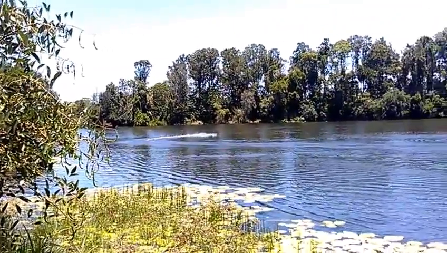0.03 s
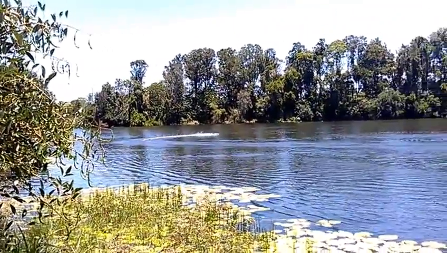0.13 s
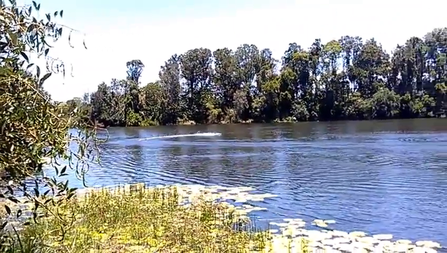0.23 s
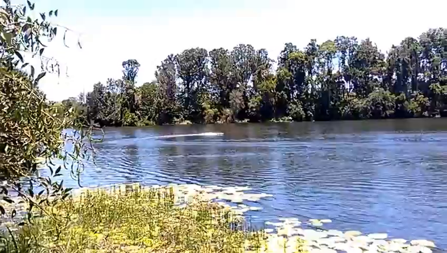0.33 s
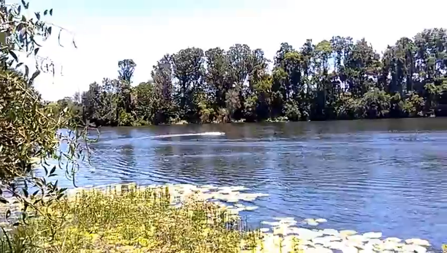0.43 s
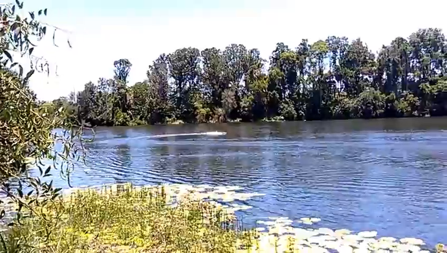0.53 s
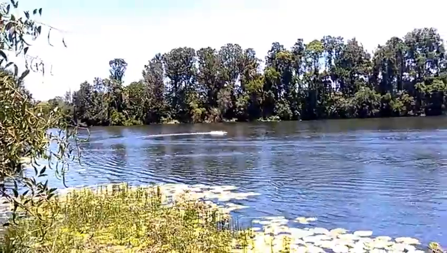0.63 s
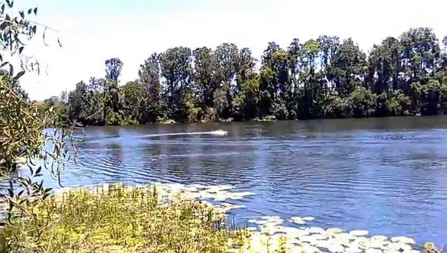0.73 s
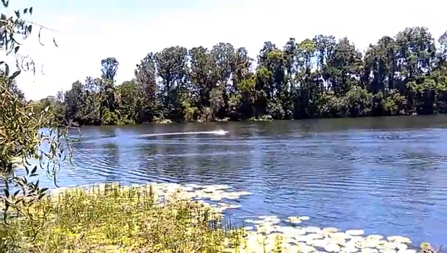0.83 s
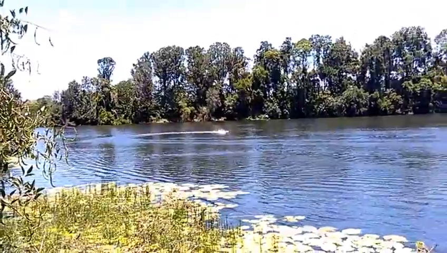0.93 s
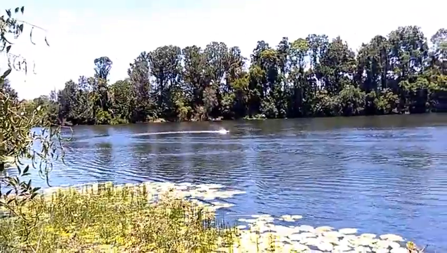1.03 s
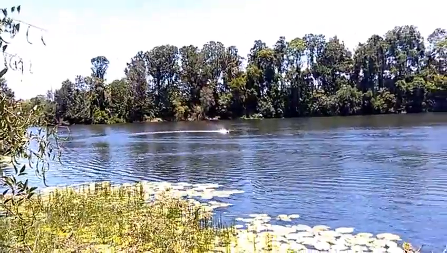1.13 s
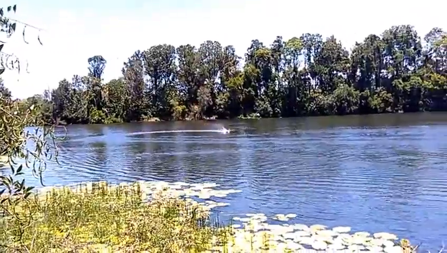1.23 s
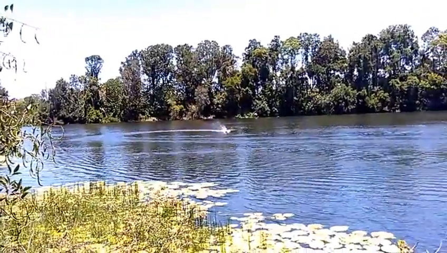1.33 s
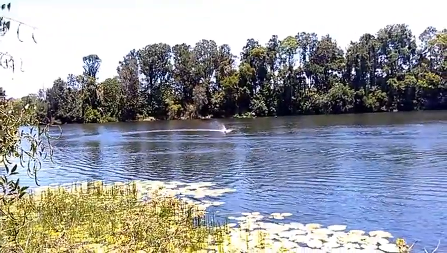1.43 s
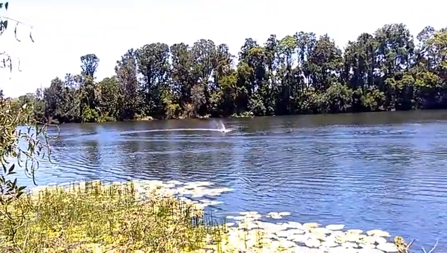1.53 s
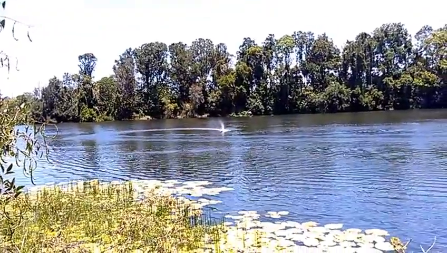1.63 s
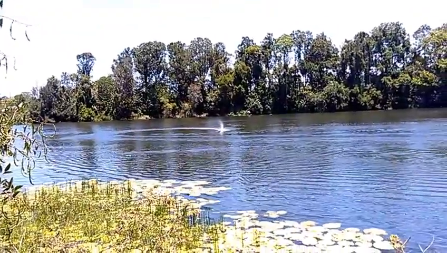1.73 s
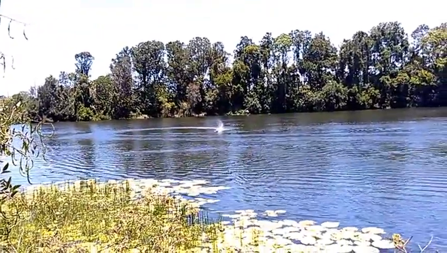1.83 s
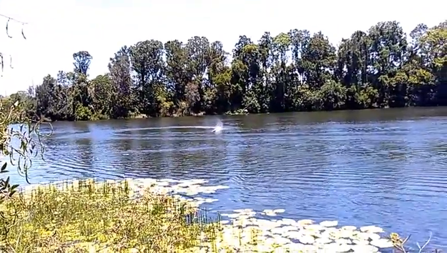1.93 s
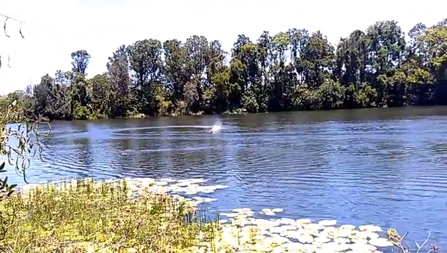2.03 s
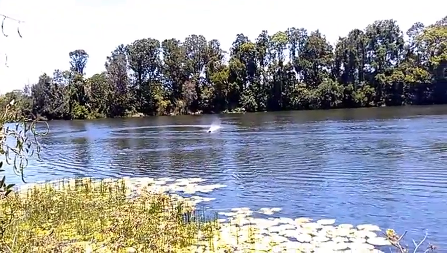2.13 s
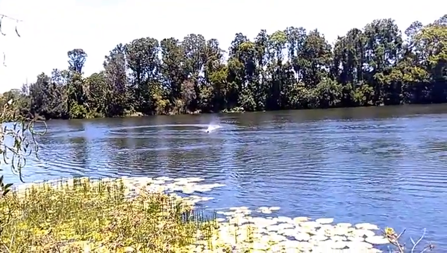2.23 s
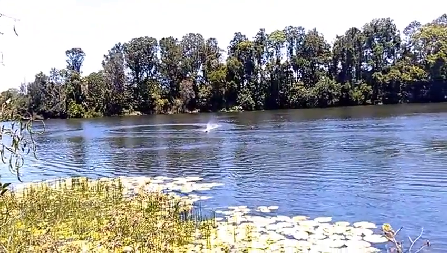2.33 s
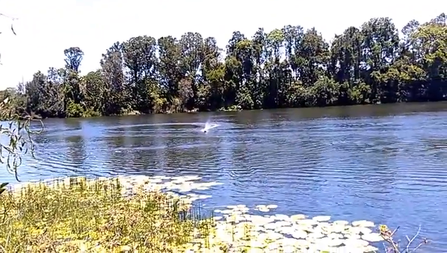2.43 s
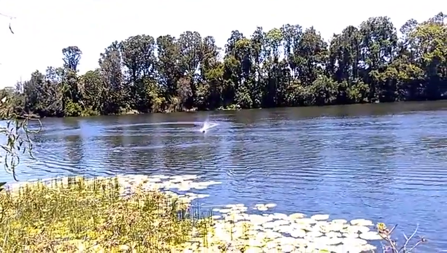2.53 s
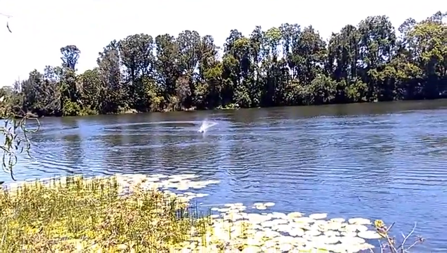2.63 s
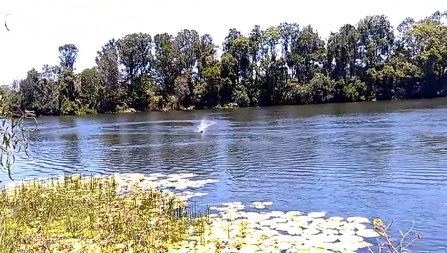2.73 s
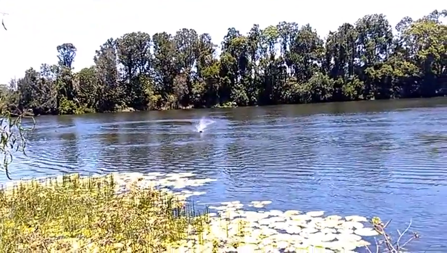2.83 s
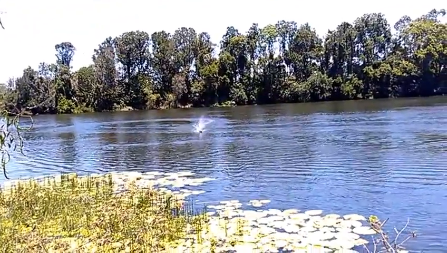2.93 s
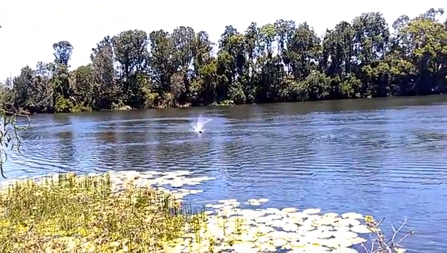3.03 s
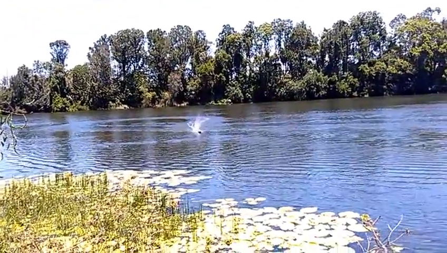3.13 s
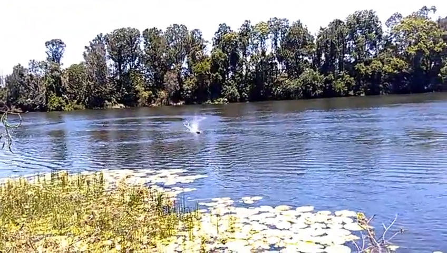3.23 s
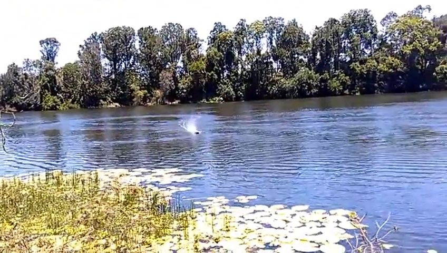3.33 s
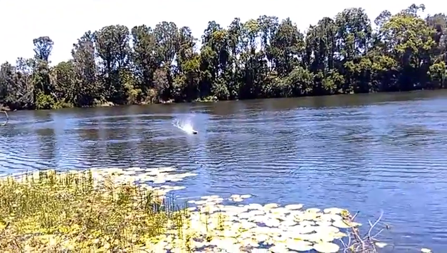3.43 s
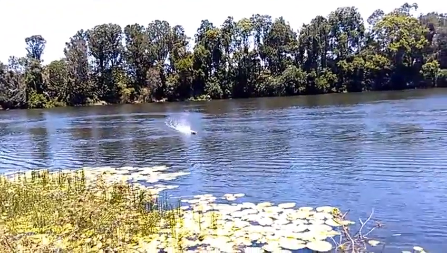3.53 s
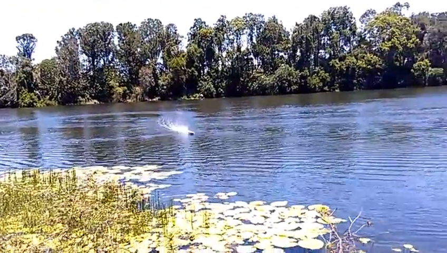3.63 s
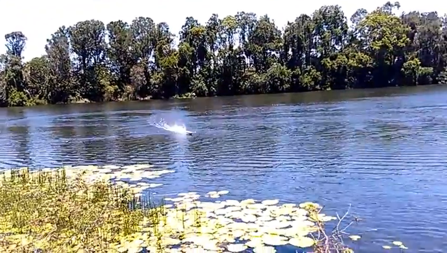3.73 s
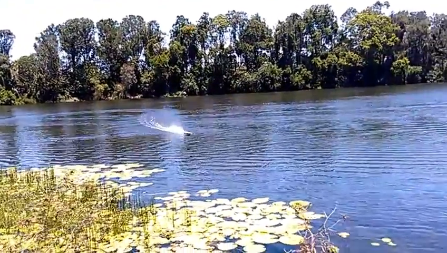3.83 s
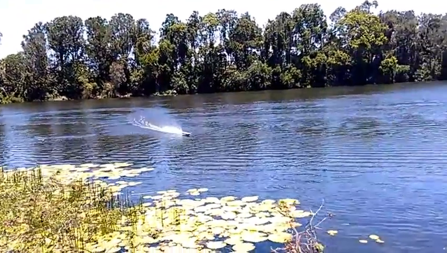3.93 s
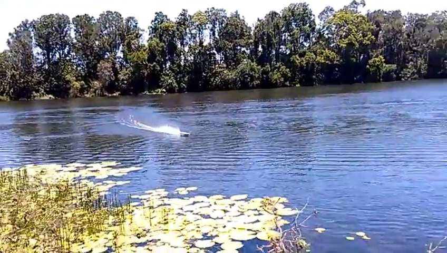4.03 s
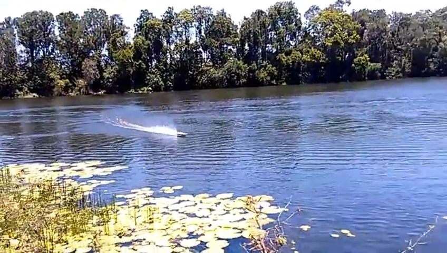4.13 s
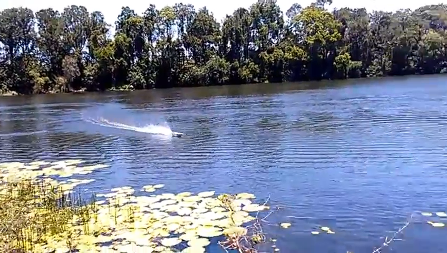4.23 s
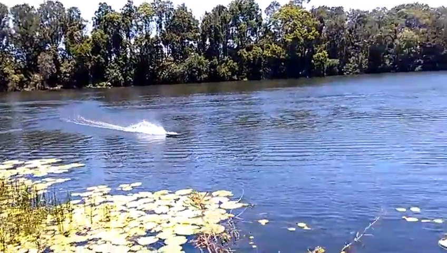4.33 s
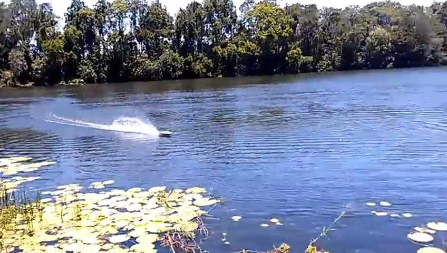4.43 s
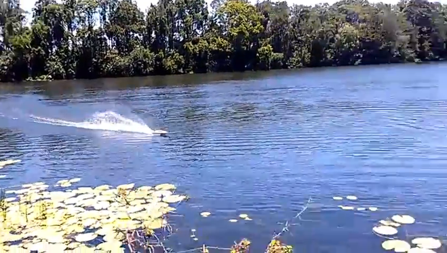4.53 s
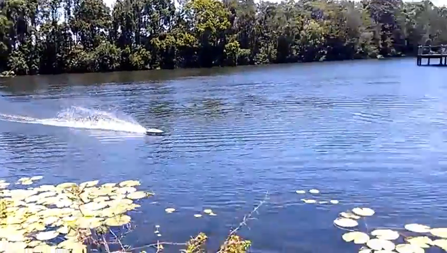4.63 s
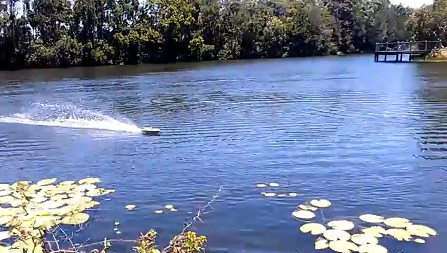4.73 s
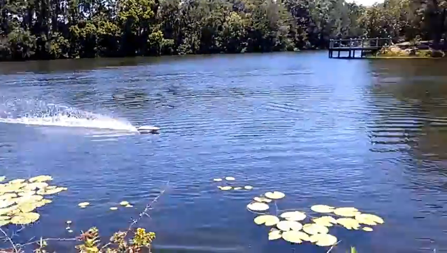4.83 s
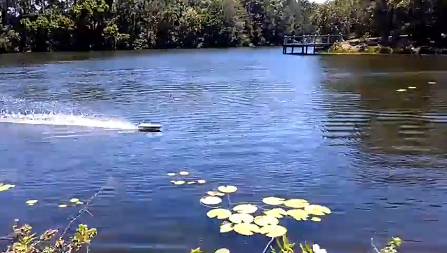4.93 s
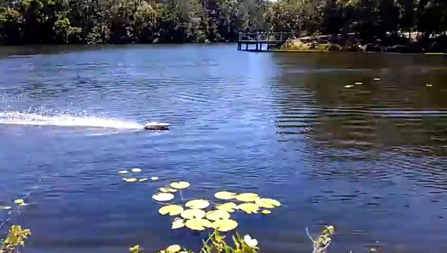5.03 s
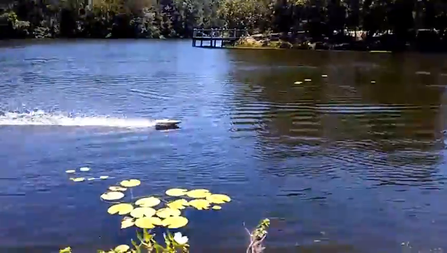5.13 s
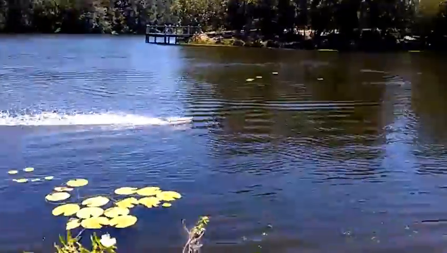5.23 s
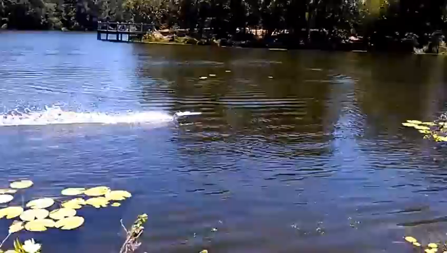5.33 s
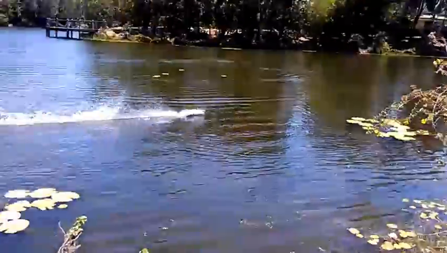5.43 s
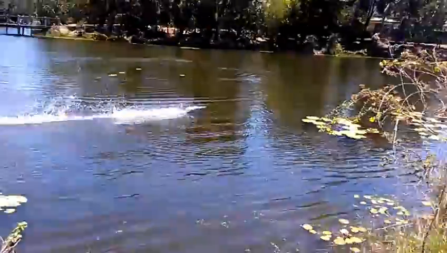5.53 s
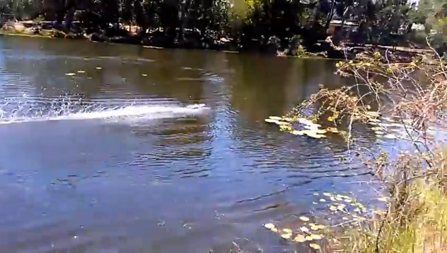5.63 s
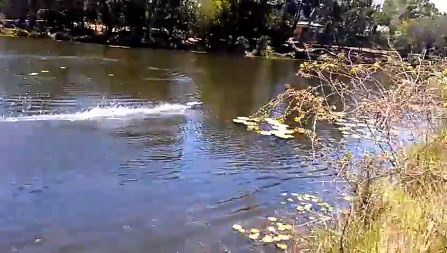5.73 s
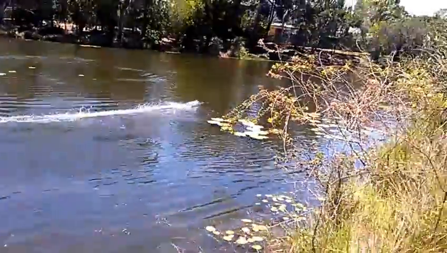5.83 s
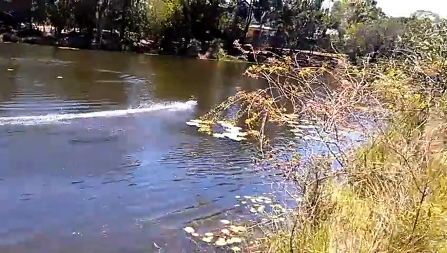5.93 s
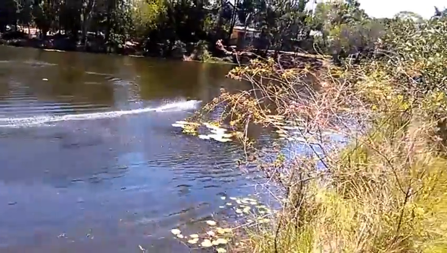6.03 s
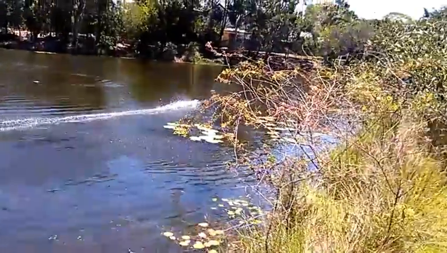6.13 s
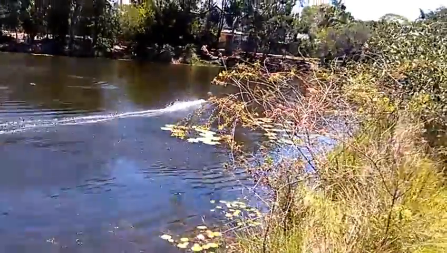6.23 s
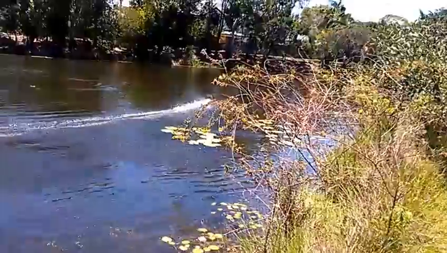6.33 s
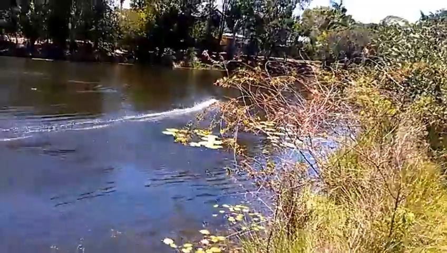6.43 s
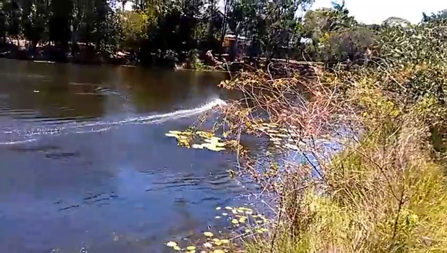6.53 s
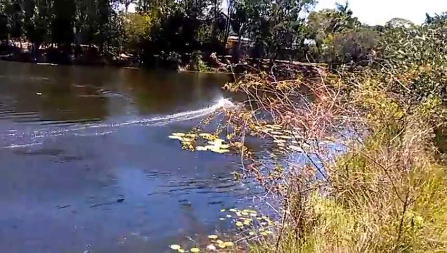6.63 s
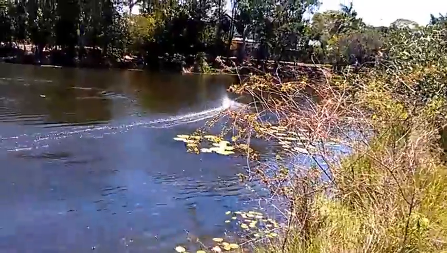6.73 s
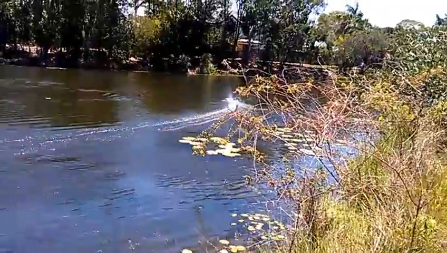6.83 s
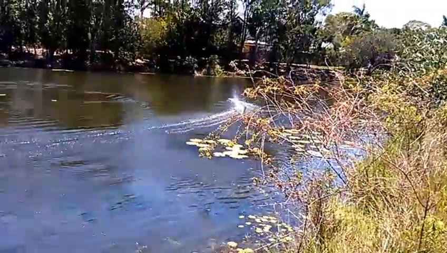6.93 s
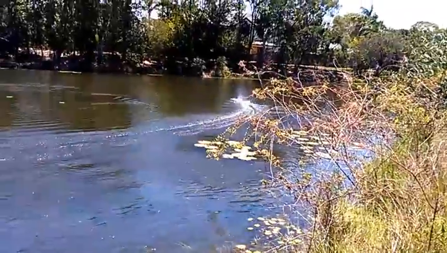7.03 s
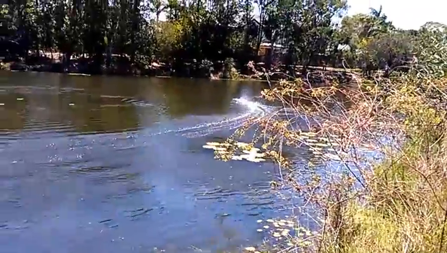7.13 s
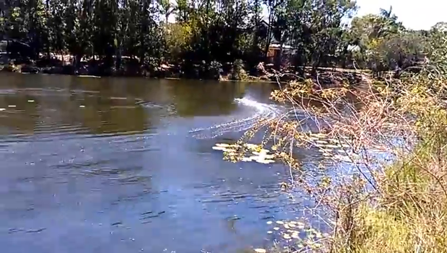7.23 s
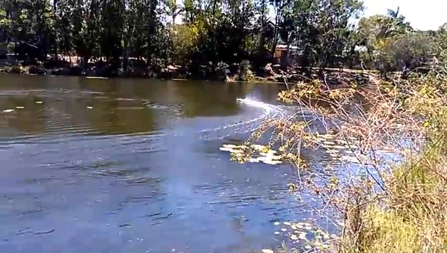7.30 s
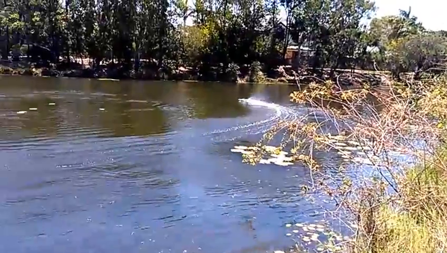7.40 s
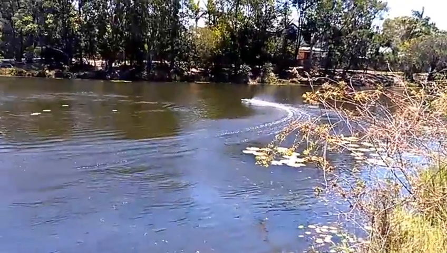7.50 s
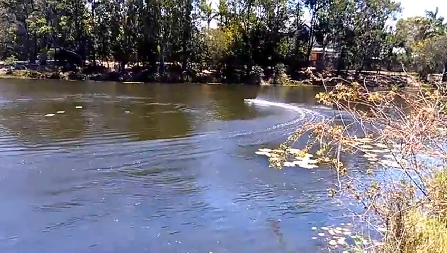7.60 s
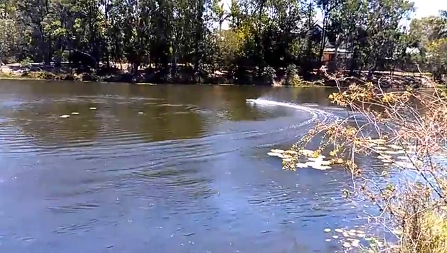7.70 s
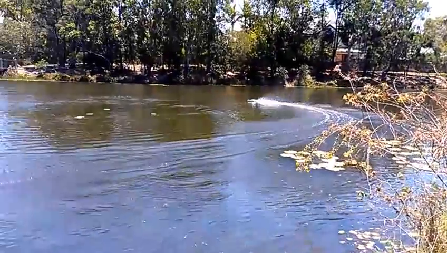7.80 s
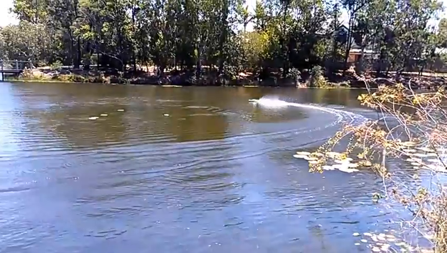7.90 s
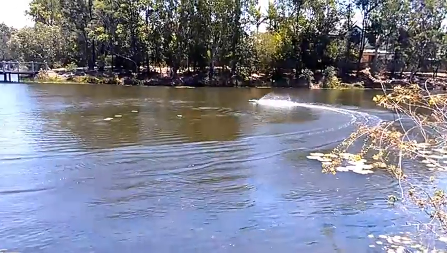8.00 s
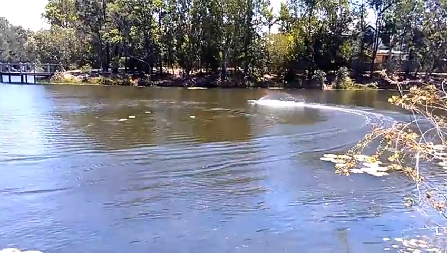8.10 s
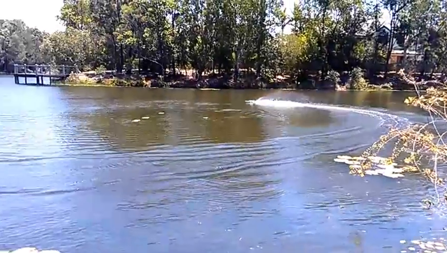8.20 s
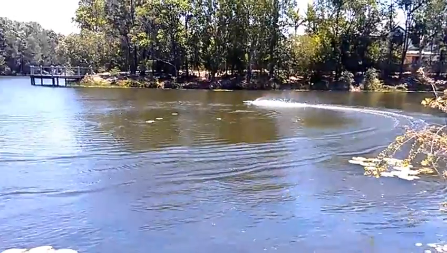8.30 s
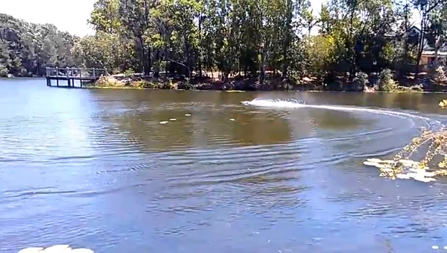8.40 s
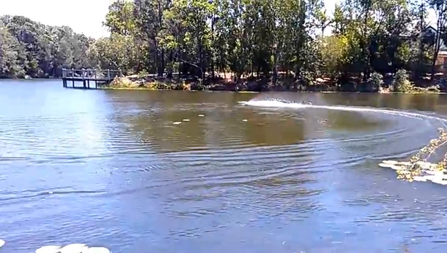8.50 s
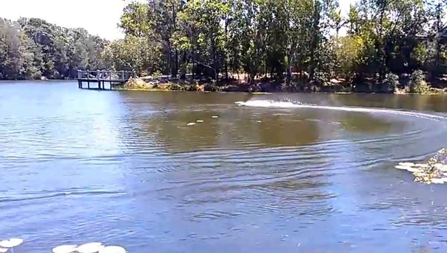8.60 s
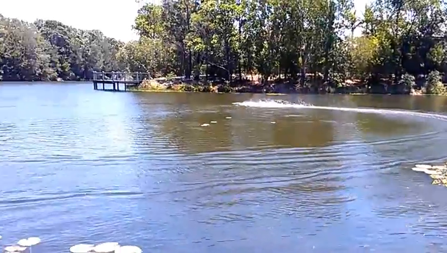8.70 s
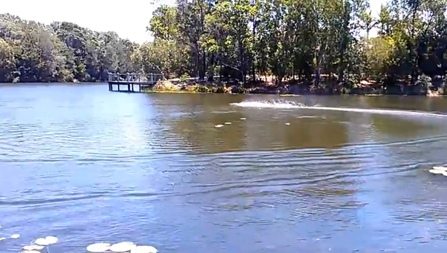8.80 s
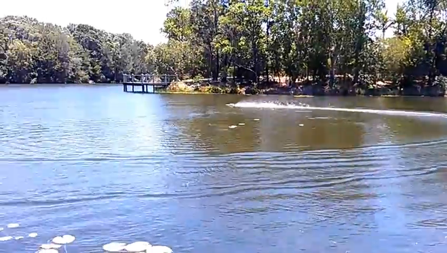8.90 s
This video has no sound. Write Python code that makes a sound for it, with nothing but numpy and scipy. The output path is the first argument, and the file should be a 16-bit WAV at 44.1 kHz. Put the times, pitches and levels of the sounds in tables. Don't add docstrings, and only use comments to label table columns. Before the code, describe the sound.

Fast model boat skims past: thin buzzy motor whine, ripping water and hard hollow slaps, heard from a wooded bank with hissing insects.

```python
import sys
import numpy as np
from scipy import signal
from scipy.fft import rfft, irfft, next_fast_len
from scipy.io import wavfile
from scipy.ndimage import uniform_filter1d, map_coordinates

SR = 44100
rng = np.random.default_rng(int(sys.argv[2]) if len(sys.argv) > 2 else 0)


def ratio_of_db(decibels):
    return 10 ** (np.asarray(decibels, float) / 20)


def waveform_to_disk(signal):
    frames = np.transpose(np.atleast_2d(signal))
    scaled = np.clip(frames, -1, 1) * 32767
    samples = np.round(scaled).astype(np.int16)
    wavfile.write(sys.argv[1], SR, samples)


N = 395136


def unit(x):
    return x / np.sqrt(np.mean(x ** 2) + 1e-20)


def curves(rows):
    times, *columns = np.transpose(rows)
    return [np.interp(np.arange(N) / SR, times, column) for column in columns]


def wobble(rate):
    knots = rng.standard_normal(int(N * rate / SR) + 4)
    return map_coordinates(knots, [np.arange(N) * rate / SR])


def filtered(x, response):
    size = next_fast_len(len(x) + 8192)
    return irfft(rfft(x, size) * response(np.fft.rfftfreq(size, 1 / SR)), size)[:len(x)]


def modes(table):
    def response(f):
        total = 0
        for k, (centre, width, db) in enumerate(table):
            total = total + (-1) ** k * ratio_of_db(db) * 1j * f * width / (centre * centre - f * f + 1j * f * width)
        return total
    return response


def rush(spectrum, patchy_db, source=None):
    if source is None:
        source = rng.standard_normal(N)
    z = signal.stft(source, nperseg=512)[2]
    across_hz = uniform_filter1d(rng.standard_normal(z.shape), 6, 0)
    patches = unit(uniform_filter1d(across_hz, 10, 1))
    x = signal.istft(z * ratio_of_db(patchy_db * patches), nperseg=512)[1][:N]
    f, db = np.transpose(spectrum)
    return unit(filtered(x, lambda hz: ratio_of_db(np.interp(np.log(hz + 1), np.log(f), db, -120, -120))))


# (time [s], shaft speed [turns/s])
THROTTLE = [(0, 271), (1.32, 273), (1.9, 292), (4.22, 291), (4.32, 310), (4.45, 410), (5.5, 399),
            (5.555, 416), (5.6, 340), (5.69, 320), (5.79, 250), (6.09, 243), (6.21, 292), (6.8, 273),
            (7.82, 275), (7.93, 306), (8.055, 390.5), (8.96, 393)]


def shaft_angle():
    flutter = 1 + 0.001471 * wobble(30)
    return 2 * np.pi * np.cumsum(curves(THROTTLE)[0] * flutter) / SR


# (time [s], half length [s], water gain [dB], whine gain [dB], high-order gain [dB])
LEAPING = [(0.208, 0.18, 7.5, 4, -4.5), (3.062, 0.024, 3, -3, 4), (3.281, .03, 1.5, -2, 3),
           (4.478, 0.019, 2.5, 8.5, -2.5), (4.591, 0.037, 1.5, 6, 3.5), (4.699, 0.037, 1, -0.5, 2.5),
           (4.807, 0.044, 11.5, 0, -3), (4.975, 0.037, 13, -4, 13.5), (5.07, 0.041, 5.5, -14, 23.5),
           (5.346, 0.038, 5, 9.5, -2.5), (5.496, 0.016, 5, 9, -5), (5.559, .012, 7, 3.5, -6),
           (5.751, 0.026, 4, -5, -7), (5.938, 0.053, 7.5, 0.5, -3), (6.084, .05, 3, 1.5, -12),
           (8.058, 0.028, 10.5, 7, 1.5), (8.16, 0.041, 4.5, 6, 4), (8.401, 0.048, 4, 4, -1),
           (8.698, 0.024, 2, 4, 4.5), (8.785, 0.028, 7, -4.5, 10), (8.843, 0.017, 3, 4, 5),
           (4.428, 0.019, 1, 5, -3), (7.631, 0.034, 2, 0, -6), (7.2, 0.072, 2.5, 0.1, 1)]
FURTHER_LEAPS = [(4.641, .02, -3, -9.5, -4), (4.887, 0.023, 1.5, -2, 4), (5.192, 0.026, -9, -1.5, -6),
                 (5.446, 0.021, -7, 4, -7), (5.526, .022, -2.5, -13, -14), (1.547, 0.091, -2.5, 0.1, 0.1),
                 (5.643, .05, -2, 1, -8), (8.113, .02, 0.5, -1.5, -1.5), (8.55, 0.055, -0.5, 2.5, -4.5),
                 (8.833, 0.013, -1, -9, 7)]


def leaps():
    t = np.arange(N) / SR
    total = 0
    for s, half, *gains_db in LEAPING + FURTHER_LEAPS:
        total = total + np.exp(-((t - s) / half) ** 2) * np.array(gains_db)[:, None]
    return total


# (time [s], thrown water [dB], wash re water [dB], whine [dB],
# blade tone gained with the stern in view [dB])
PASS = [(0, -40.5, -4, -56, 8), (.7, -43, -1, -57, 0.5), (1.7, -48.5, 1, -56.5, 1.5),
        (2.2, -42, -2, -54.5, -1), (3.3, -34.5, -6, -49, -8.5), (4.16, -33.5, -4.5, -45.5, -5),
        (4.35, -32, -1.5, -39.5, 5.5), (4.46, -27, -1, -34, -2), (5.48, -32.5, -4, -39.5, 6.5),
        (5.59, -33, -4, -49, -3), (5.86, -30, -2, -47.5, 17.5), (6.2, -30.5, -3, -46.5, 4.5),
        (6.75, -39.5, 0.5, -54, 11.5), (7.25, -35, -6.5, -53.5, 16), (7.85, -28.5, -8.5, -56, 22.5),
        (8.04, -28.5, -6, -36.5, 6.5), (8.6, -28, -4, -37, 9), (8.96, -24.5, -6, -37, 4.5)]
# (frequency [Hz], level [dB])
HULL_RADIATION = [(250, -1.5), (388, -6.5), (404, -1.5), (570, -0.6), (820, 8.5), (1172, 0), (1212, -8),
                  (1640, 4)]


def order_db(k):
    f, db = np.transpose(HULL_RADIATION)
    return curves(PASS)[2] + np.interp(np.log(k * curves(THROTTLE)[0]), np.log(f), db)


def covered():
    starts_db, span_db = -34.5, 13
    blade_db = order_db(2) + curves(PASS)[3]
    return uniform_filter1d(np.clip((blade_db - starts_db) / span_db, 0, 1), size=SR // 10)


# (time [s], insects [dB], breeze [dB],
# drone off the far bank [dB])
CAMERA_TURN = [(0, -47.5, -51, -39), (1, -48, -54, -40.5), (2.7, -47, -52.5, -40.5),
               (4.3, -45.5, -53, -36.5), (4.7, -41, -62.5, -39), (5.55, -45, -73, -44),
               (5.85, -40.5, -53, -37), (7.2, -43.5, -51.5, -35), (8, -44, -50.5, -35),
               (8.96, -50.5, -52.5, -35)]
# (frequency [Hz], level [dB per Hz])
INSECT_HISS = [(5000, -38), (6800, -3), (7300, 2), (7800, 3.5), (8500, -8), (10000, -20), (14000, -34)]
# (frequency [Hz], level [dB per Hz])
BREEZE_RUSH = [(30, -20), (80, -7), (200, 8.5), (450, -1), (800, 20.5)]
# (time [s], peak [dB], pitch [Hz], t60 [s])
HANDLING = [
    (0.4, -37.5, 200, 0.092),
    (.5355, -21, 5400, 0.014),
    (.58, -34, 300, 0.083),
    (2.701, -27, 382, 0.073),
]


def bank():
    insects_db = curves(CAMERA_TURN)[0] - 5 * covered() + 0.95 * wobble(3.09)
    breeze_db = curves(CAMERA_TURN)[1] + 2.1 * wobble(4.5)
    out = ratio_of_db(insects_db) * rush(INSECT_HISS, patchy_db=1.6)
    out += ratio_of_db(breeze_db) * rush(BREEZE_RUSH, patchy_db=5)
    t = np.arange(SR // 8) / SR
    for s, db, hz, t60 in HANDLING:
        decay = ratio_of_db(db - 60 * t / t60)
        onset = 1 - np.exp(-25 * t / t60)
        ring = np.sin(2 * np.pi * hz * t + 2.0 * wobble(105)[:len(t)])
        out[round(s * SR):][:len(t)] += decay * ring * onset
    return out


# (time [s], peak [dB], hollow boom re peak [dB], echo re boom [dB])
HULL_SLAPS = [(0.015, -11.5, -10.5, -11), (0.147, -20, -2.5, -25), (0.286, -12.5, -9, -10),
              (0.522, -11.5, -8.5, -5.5), (0.538, -15, -23, -21), (0.949, -28, 1, -20),
              (1.199, -21, -2.5, -25), (1.283, -13, -10, -10), (1.723, -10, -5.5, -5),
              (4.186, 3.5, -17, -5.5), (4.324, -11.5, -8, -19), (4.331, -10, -4, -25),
              (4.652, -10, -21, -18), (4.694, -6, -30, -26), (4.842, -2.5, -3.5, -36),
              (5.055, -1.5, -14, -13), (5.379, -7, -9, -15), (5.554, -22, -16, -24), (7.617, -17, -12, -17),
              (7.773, 0, -14.5, -7), (7.871, 2.5, -16, -7)]
# (frequency [Hz], width [Hz], level [dB])
PANELS = [(1290, 300, -10.5), (1684, 160, -1), (1940, 180, -3), (2315, 290, 0.7), (3630, 1200, -5)]
# (frequency [Hz], width [Hz], level [dB])
CAVITY = [(600, 120, -11), (800, 110, 0), (1000, 140, -3)]


def slaps():
    out, t = np.zeros(N + SR), np.arange(SR // 4) / SR

    def panels(f):
        cushion = .25 + 1 / (1 - (f / 2400) ** 2 + .7j * f / 2400) ** 2
        return modes(PANELS)(f) * cushion

    def cavity(f):
        return modes(CAVITY)(f) * modes([(820, 700, 0)])(f)

    decay = ratio_of_db(-60 * t / .03)
    late = decay * (1 - np.exp(-(t / .0015) ** 2))
    for s, db, boom_db, echo_db in HULL_SLAPS:
        splash, air, echo = rng.standard_normal((3, len(t)))
        blow = np.exp(-((t - .001) / .00006) ** 2) + .22 * splash * decay * (t > .001)
        crack = filtered(blow, panels)
        boom = filtered(air * late, cavity)
        low_tail = ratio_of_db(-60 * t / 0.2) * unit(filtered(echo, cavity))
        high_tail = 0.73 * ratio_of_db(-60 * t / 0.12) * unit(filtered(echo, panels))
        tail = (1 - np.exp(-t / 0.0013)) * (low_tail + high_tail)
        hollow = boom / np.abs(boom).max() + ratio_of_db(echo_db + 2.5) * tail
        hit = crack / np.abs(crack).max() + ratio_of_db(boom_db + 1.5) * hollow
        out[round(s * SR) - SR // 2500:][:len(t)] += ratio_of_db(db - 3.5) * hit
    return out[:N]


# (frequency [Hz], level [dB per Hz])
SPRAY_COLOUR = [(2400, -23), (3000, -16), (3400, -4.5), (3800, -2.5), (4400, -5), (5700, -4.5),
                (6400, -8.5), (6900, -16.5), (8500, -18), (11000, -39.5)]
WASH_COLOUR = [(250, -78), (400, -4.5), (600, -19), (1200, -10.5), (1900, 3.5), (2600, -1), (3100, -6.5),
               (5000, -21)]
MIST_COLOUR = [(6500, -18), (8500, -2), (10000, -2), (12000, -11), (14000, -20.5), (15800, -30)]
DRONE_COLOUR = [(200, -36), (330, -15.5), (600, -10.5), (820, 0.5), (1000, -10.5), (1400, -10.5),
                (2500, -40)]


def water(angle, leap_db):
    water_db, share_db = curves(PASS)[:2]
    insects_db, _, far_bank_db = curves(CAMERA_TURN)
    splash_db, whine_db, high_db = leap_db
    spray_db = water_db + splash_db
    wash_db = spray_db + share_db + 0.2 * (whine_db + high_db)
    mist_db = -57.5 + 1.02 * (water_db + 35) + 1.2 * splash_db
    mist_db = mist_db + 0.84 * (insects_db + 45)
    mist_db = mist_db - 6 * covered() + 2.2 * wobble(9)
    drone_db = far_bank_db + 0.13 * (water_db + 32.5) + 0.37 * splash_db + 2.1 * wobble(8)
    chop = 1 + .17 * np.cos(angle) + .15 * np.cos(2 * angle)

    def torn():
        return chop * rng.standard_normal(N)

    surge = wobble(18)
    spray = ratio_of_db(spray_db + .9 * surge) * rush(SPRAY_COLOUR, patchy_db=1.1, source=torn())
    wash = ratio_of_db(wash_db + 2 + .8 * surge) * rush(WASH_COLOUR, patchy_db=1.1, source=torn())
    mist = ratio_of_db(mist_db + 3.0) * rush(MIST_COLOUR, patchy_db=1.5)
    drone = ratio_of_db(drone_db) * rush(DRONE_COLOUR, patchy_db=2.0)
    return spray + wash + mist + drone


# (multiple, level [dB], share of the whine gain, share of the high-order gain, drift [dB])
STRONG_ORDERS = [(1, -1.5, 0.52, 0.17, 1.1), (3, -4, 1.15, 0.5, 2.5), (4, -0.5, 1.28, 1.21, 2),
                 (6, -4, .9, 0.65, 3.5)]
# (multiple, level [dB])
UPPER_ORDERS = [(5, -6), (7, -6.5), (8, -5.5), (9, -6.5), (10, -4.5), (11, -9), (12, -6.5), (13, -7),
                (14, -16), (15, -20), (16, -40)]


def motor(angle, leap_db):
    turns, (_, whine_db, high_db) = curves(THROTTLE)[0], leap_db
    t = np.arange(N) / SR
    race_db = 20.5 * np.exp(-((t - 5.545) / 0.039) ** 2)
    sing_db = 10 * np.clip((t - 8.62) / 0.041, 0, 1)
    lift_db = {1: race_db, 6: sing_db}
    orders = []
    for k, db, own, share, drift_db in STRONG_ORDERS:
        level_db = order_db(k) + db + own * whine_db + share * high_db
        orders.append((k, level_db + lift_db.get(k, 0) + drift_db * wobble(7)))
    blade_db = order_db(2.01) + curves(PASS)[3] - 1.5 + whine_db + 0.97 * wobble(6.3)
    orders.append((2, blade_db))
    buzz_db = -38.5 + 1.09 * (curves(PASS)[2] + whine_db + high_db + 39.5)
    buzz_db = uniform_filter1d(buzz_db, size=SR // 6)
    buried_db = np.interp(turns, [396, 403], [0, 3.5])
    for k, db in UPPER_ORDERS:
        orders.append((k, buzz_db + db - buried_db + 2.0 * wobble(5)))
    rough = np.interp(turns, [300, 390, 402], [.025, .065, .085])
    out = np.zeros(N)
    for k, db in orders:
        flicker_db = (1.4 + .15 * k) * wobble(25)
        phase = k * angle + k * rough * wobble(70) + k * k
        out += np.sqrt(2) * ratio_of_db(db + flicker_db) * np.sin(phase)
    return out


def scene():
    angle, leap_db = shaft_angle(), leaps()
    return (bank() + slaps() + water(angle, leap_db) + motor(angle, leap_db))[None]


def masked(x, treble_db, bass_db):
    hz, _, z = signal.stft(x, SR, nperseg=2048, noverlap=1024)
    power = np.abs(z) ** 2
    low = hz < 1000
    width = np.where(low, 4, 32)
    band = np.unique(low * -999 + np.arange(len(hz)) // width, return_inverse=True)[1]
    member = band == np.arange(band.max() + 1)[:, None]
    level = (member @ power / member.sum(1, keepdims=True))[band]
    limit = power.mean(0) * ratio_of_db(2 * np.where(low, bass_db, treble_db))[:, None]
    uneven_db = 3.7 * rng.standard_normal((len(member), z.shape[1]))
    limit = limit * ratio_of_db(uneven_db)[band]
    return signal.istft(z * (level > limit), SR, nperseg=2048, noverlap=1024)[1][:N]


def roll_off(x):
    return signal.sosfilt(signal.butter(12, 16440, fs=SR, output="sos"), x)


def record(dry):
    cut = filtered(dry[0], lambda hz: (1j * hz / (1j * hz + 120)) ** 2)
    thinned = masked(cut, treble_db=-30.0, bass_db=-42.0)
    clipped = np.clip(thinned, -.76, .76)
    return roll_off(clipped[None])


dry = scene()
out = record(dry)
waveform_to_disk(out)
```